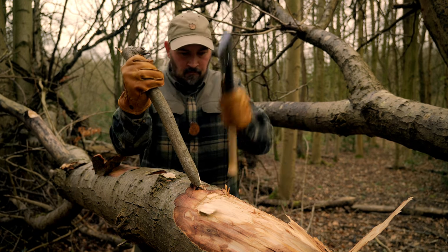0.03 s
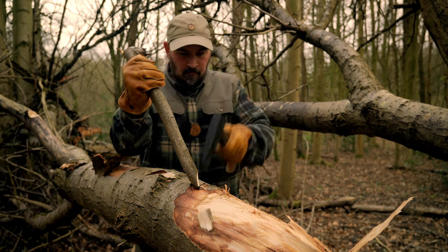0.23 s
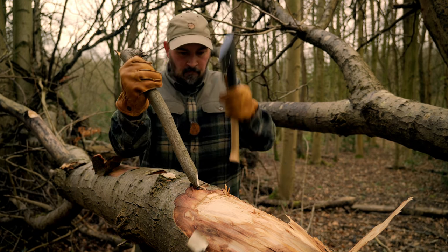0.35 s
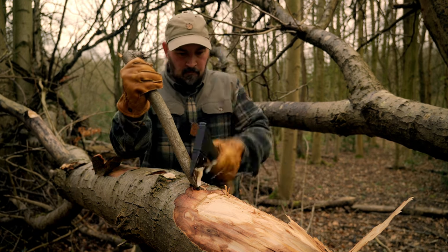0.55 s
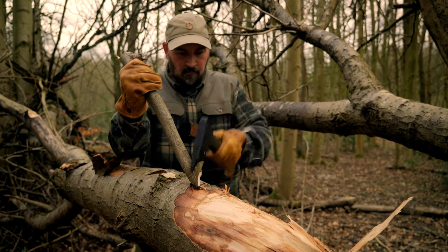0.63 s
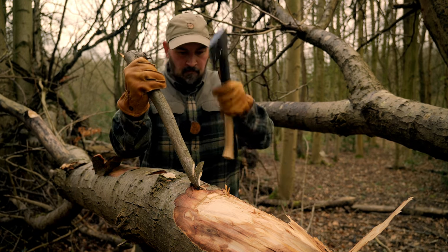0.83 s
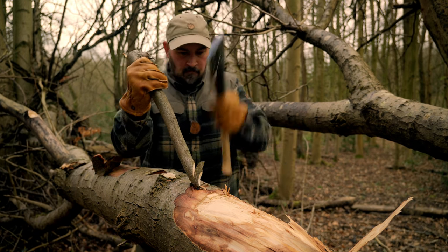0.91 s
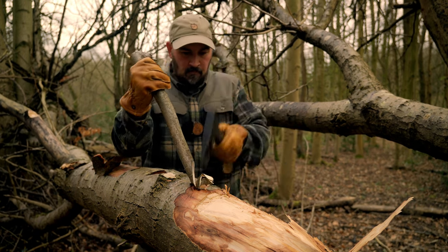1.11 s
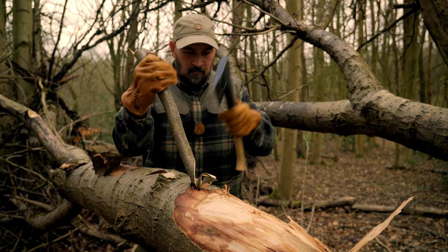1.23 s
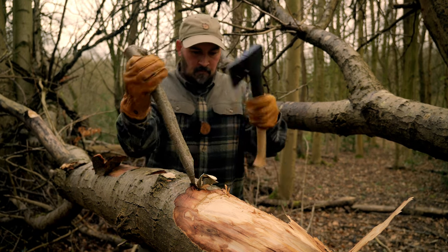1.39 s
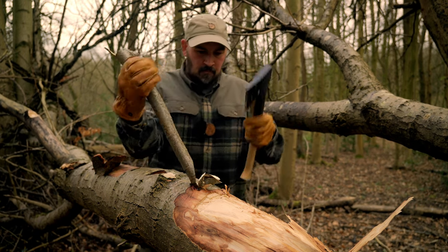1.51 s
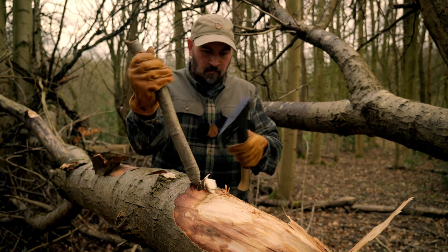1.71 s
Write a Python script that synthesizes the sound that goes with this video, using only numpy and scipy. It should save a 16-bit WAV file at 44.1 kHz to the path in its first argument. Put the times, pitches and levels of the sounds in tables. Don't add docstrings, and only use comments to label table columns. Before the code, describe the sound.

A hatchet strikes a wooden stake propped on a log, three evenly spaced sharp cracks with brief steely ring and woody knock, small chips ticking into dry leaves; close, dry, outdoors over faint low wash.

```python
import sys
import numpy as np
from scipy import signal
from scipy.fft import rfft, irfft
from scipy.io import wavfile
from scipy.ndimage import uniform_filter1d

SR = 44100
rng = np.random.default_rng(int(sys.argv[2]) if len(sys.argv) > 2 else 0)


def nominal_scale(level):
    x = np.asarray(level, float) / 20
    return 10 ** x


def generate_wav(sig):
    pcm = np.round(np.clip(np.atleast_2d(sig).T, -1, 1) * 32767).astype(np.int16)
    wavfile.write(sys.argv[1], SR, pcm)


N = 77175


def read(points, x):
    place, value = np.transpose(points)
    return np.interp(x, place, value)


def evened(x):
    return x / np.sqrt(np.mean(x ** 2) + 1e-20)


def add(mix, start_s, sound):
    part = mix[round(start_s * SR):][:len(sound)]
    part += sound[:len(part)]


def resonate(x, hz, width_hz):
    radius = np.exp(-np.pi * width_hz / SR)
    pole = radius * np.exp(2j * np.pi * hz / SR)
    return 2 * signal.lfilter([1 - radius], [1, -pole], x).real


def ring(db, hz, t60, soft):
    t = np.arange(12000) / SR
    onset = np.sin(np.pi / 2 * np.minimum(t * hz / soft, 1)) ** 2
    return -nominal_scale(db - 60 * t / t60) * np.sin(2 * np.pi * hz * t) * onset


def crackle(size, per_s, spread_db):
    chance, rarity, side = rng.random((size, 3)).T
    clicks = (chance < per_s / SR) * np.sign(side - .5)
    return evened(clicks * nominal_scale(spread_db * np.minimum(-np.log(rarity + 1e-9), 4)))


def coloured(x, points):
    hz = np.fft.rfftfreq(len(x), 1 / SR)
    f, db = np.transpose(points)
    gain = nominal_scale(np.interp(np.log(hz + 1), np.log(f + 1), db, left=-60))
    return evened(irfft(rfft(x) * gain, len(x)))


# start_s, length_s, level_db, bright_db (per octave)
BLOWS = [
    (.2360, 0.0087, -20.5, 0.5),
    (.6670, 0.011, -25.5, 0.5),
    (1.1020, 0.021, -29, 0.5),
]
# pitch_hz, width_hz, level_db
BLADE_TONES = [(3300, 260, -4), (4300, 1100, 1), (5500, 1400, -2), (7180, 1800, -1), (2500, 200, -7),
               (8820, 3000, -9), (1390, 1400, -2), (12000, 4000, -35)]


def cut(start_s, length_s, level_db, bright_db):
    contact_db, ease_db, tear_t60_s = -13, -8.5, .012
    bite_share, bite_power = 0.3, 0.93
    t = np.arange(4000) / SR
    progress = t / length_s
    bite = nominal_scale(contact_db) + np.minimum(progress / bite_share, 1) ** bite_power
    easing_db = ease_db * np.clip(progress - bite_share, 0, 1)
    parting_db = -60 * np.maximum(t - length_s, 0) / tear_t60_s
    tear = bite * nominal_scale(easing_db + parting_db) * crackle(size=4000, per_s=6000, spread_db=3)
    blade = np.zeros(len(t))
    sign = 1
    for hz, width_hz, tone_db in BLADE_TONES:
        tone = resonate(resonate(tear, hz, width_hz), hz, 2 * width_hz)
        tone_db = tone_db + bright_db * np.log2(hz / BLADE_TONES[0][0])
        blade += sign * nominal_scale(tone_db) * tone * np.sqrt(SR / width_hz / 10)
        sign = -sign
    return start_s, nominal_scale(level_db) * blade


# start_s, peak_db, pitch_hz, t60_s
FIBRE_SNAPS = [(.2380, -16, 3160, .012), (.2405, -12, 3404, .010), (0.2419, -7.5, 3120, 0.013),
               (.2470, -19, 3400, 0.0094), (0.6695, -5.5, 3350, 0.0064), (0.669, -14.5, 6920, 0.013),
               (.6708, -19.5, 3280, 0.013), (0.673, -3, 4040, .003), (.6735, -7, 3620, .003),
               (0.6671, -20.5, 2660, .006), (.6737, -7.5, 5870, .003), (0.6768, -18, 4200, 0.011),
               (1.1045, -12.5, 3200, .010), (1.1053, -11, 4990, 0.0034), (1.108, -10, 3428, 0.019),
               (1.115, -10.5, 3150, 0.014), (1.114, -18, 3300, .015), (1.1174, -12.5, 5500, 0.0065),
               (1.1181, -17, 3100, .008)]


def snap(start_s, peak_db, pitch_hz, t60_s):
    return start_s, ring(peak_db, pitch_hz, t60_s, soft=0.93)


# start_s, peak_db, stake pitch_hz, t60_s, log_db
STAKE_KNOCKS = [(.2365, -25.5, 620, .015, -25), (.2425, -20.5, 520, .02, -25.5),
                (.2462, -3.5, 529, .014, -20), (.2520, -20, 830, 0.011, -26.5),
                (.2600, -18, 517, 0.022, -52), (.2860, -45, 480, .04, -53), (.6682, -14, 487, 0.019, -32.5),
                (.6900, -44, 150, .06, -47.5), (.6770, -22, 830, 0.023, -49),
                (1.1020, -17.5, 988, 0.025, -32.5), (1.1030, -19.5, 1600, 0.026, -42.5),
                (1.1050, -18, 430, 0.029, -44.5), (1.1240, -30, 345, 0.028, -39.5)]
# pitch_hz, level_db, t60_s
LOG_TONES = [(120, -22, 0.11), (159.3, -5.5, 0.099), (248.7, -3, 0.11), (347, -9.5, 0.11),
             (430, -5.5, 0.13), (642.4, -4, 0.057), (1144, -6.5, 0.035)]
# pitch_hz, level_db
ROCKING_COLOUR = [(80, -27.5), (130, -2), (230, 0), (350, 2.5), (500, -7.5), (900, -24), (2500, -67.5)]


def knock(start_s, peak_db, pitch_hz, t60_s, log_db):
    rock_db, rock_t60_s, rock_rise_s = -13.5, 0.18, 0.0058
    t = np.arange(12000) / SR
    stake = ring(peak_db, pitch_hz, t60_s, soft=.6)
    rock = coloured(rng.standard_normal(len(t)), ROCKING_COLOUR)
    rock *= nominal_scale(log_db + rock_db - 60 * t / rock_t60_s) * np.minimum(t / rock_rise_s, 1)
    hum = sum(ring(log_db + tone_db, hz, tone_t60_s, soft=0.57) for hz, tone_db, tone_t60_s in LOG_TONES)
    return start_s, stake + rock + hum


# start_s, level_db, pitch_hz, scatter t60_s, dry edge_db
LANDINGS = [(.130, -55, 2890, 0.018, -10), (.295, -65.5, 4000, 0.13, -4), (.530, -59, 2500, 0.054, -19),
            (.604, -43.5, 2390, 0.033, -3), (.852, -54.5, 1900, 0.06, 3.5),
            (.9355, -36.5, 1800, 0.018, -17.5), (.942, -58.5, 4070, 0.062, -2.5),
            (.964, -65, 5870, 0.021, -5), (1.062, -71, 4887, 0.012, -1.5),
            (1.071, -49.5, 5940, .015, -11.5), (1.190, -61, 5500, 0.17, -9),
            (1.204, -54.5, 4000, 0.032, -6), (1.273, -61.5, 4020, .015, -4.5),
            (1.334, -43, 2500, 0.026, -7), (1.358, -43, 1700, 0.015, -5), (1.359, -51.5, 9500, 0.023, -3.5),
            (1.3865, -45, 4500, 0.013, -11), (1.394, -47, 1400, 0.094, -17.5), (1.425, -62, 7500, .015, -6),
            (1.511, -54.5, 7650, 0.011, -5.5), (1.600, -63.5, 8000, 0.062, -2),
            (.705, -56.5, 3000, 0.11, -9.5), (.270, -52, 7160, 0.014, -8.5), (.456, -68.5, 5950, 0.023, -2)]


def chip(start_s, level_db, pitch_hz, t60_s, edge_db):
    rise_s, leaf_hz, leaf_width_hz = 0.0012, 5500, 4600
    width_hz = pitch_hz / 0.98
    t = np.arange(8000) / SR
    ticks = crackle(size=8000, per_s=5000, spread_db=-2.0)
    ticks *= nominal_scale(-60 * t / t60_s) * np.minimum(t / rise_s, 1)
    body = resonate(resonate(ticks, pitch_hz, width_hz), pitch_hz, width_hz) * np.sqrt(SR / pitch_hz / 4)
    edge = resonate(resonate(ticks, leaf_hz, leaf_width_hz), leaf_hz, leaf_width_hz)
    return start_s, nominal_scale(level_db) * (body + nominal_scale(edge_db) * edge)


# pitch_hz, level_db (per Hz)
RUSTLE_COLOUR = [(880, -33), (1500, 0), (1990, -4), (3440, -6.5), (3720, -7.5), (7600, -10.5), (15500, -44)]
# time_s, level_db
RUSTLE_LEVEL = [(0, -82.5), (.4, -80), (.75, -75), (1.0, -78), (1.15, -68.5), (1.3, -74), (1.42, -59),
                (1.5, -65.5), (1.6, -65.5), (1.65, -70), (1.75, -66)]


def rustle():
    t = np.arange(N) / SR
    flicker_db = 2.3 * evened(uniform_filter1d(rng.standard_normal(N), size=700))
    rubbing = coloured(crackle(size=N, per_s=7200, spread_db=3.5), RUSTLE_COLOUR)
    return rubbing * nominal_scale(read(RUSTLE_LEVEL, t) + flicker_db)


# pitch_hz, level_db
BARK_COLOUR = [(100, 3), (5000, -0.5), (9000, -6.5), (16000, -27.5)]


def trees(x):
    near_db, near_t60_s = -31, 0.089
    far_db, far_t60_s, far_rise_s = -43.5, .4, 0.013
    t = np.arange(SR // 2) / SR
    near, far = (coloured(noise, BARK_COLOUR) for noise in rng.standard_normal((2, len(t))))
    near = near * nominal_scale(-60 * t / near_t60_s)
    far = far * nominal_scale(-60 * t / far_t60_s) * np.minimum(t / far_rise_s, 1)
    tail = nominal_scale(near_db) * near / np.linalg.norm(near) + nominal_scale(far_db) * far / np.linalg.norm(far)
    return signal.fftconvolve(x, tail)[:N]


# pitch_hz, level_db (per Hz)
WASH_COLOUR = [(15, -46), (25, -14.5), (495, -3.5), (684, -7.5), (762, -3), (1340, -10), (1850, -25),
               (3260, -26), (15500, -43)]
# time_s, level_db
SWELL = [(0, -4), (.4, -3.5), (.85, -5.5), (1.1, -5), (1.3, -2), (1.75, -1.5)]


def wash():
    t = np.arange(N) / SR
    return coloured(rng.standard_normal(N), WASH_COLOUR) * nominal_scale(-56 + read(SWELL, t))


def scene():
    wood = np.zeros(N)
    for rows, source in ((BLOWS, cut), (FIBRE_SNAPS, snap), (STAKE_KNOCKS, knock), (LANDINGS, chip)):
        for row in rows:
            add(wood, *source(*row))
    return (wood + trees(wood) + rustle() + wash())[None]


def band_limit(x):
    return signal.sosfilt(signal.butter(12, 15780, fs=SR, output="sos"), x)


# pitch_hz, level_db
MIC_COLOUR = [(30, -13), (60, -8.5), (110, 0.5), (9000, -0.5), (12000, -5), (15500, -13)]


def record(dry):
    edge_hz = 15650
    hz = np.fft.rfftfreq(8192, 1 / SR)
    f, db = np.transpose(MIC_COLOUR)
    log_gain = np.log(nominal_scale(np.interp(np.log(hz + 1), np.log(f), db)))
    spectrum = np.exp(np.conj(signal.hilbert(np.r_[log_gain, log_gain[-2:0:-1]])))
    colour = np.fft.ifft(spectrum).real[:4096]
    heard = signal.oaconvolve(dry, colour[None])[:, :N]
    low_pass = signal.firwin(1023, edge_hz, window=("kaiser", 9), fs=SR)
    mix = signal.oaconvolve(heard, low_pass[None], "same")
    return band_limit(mix)


dry = scene()
out = record(dry)
generate_wav(out)
```